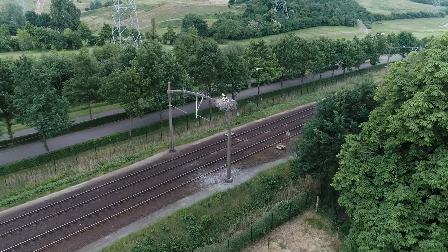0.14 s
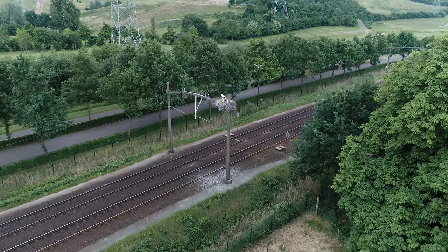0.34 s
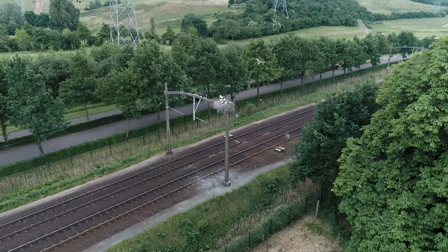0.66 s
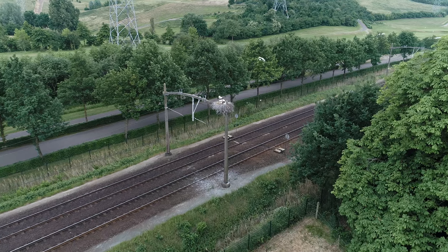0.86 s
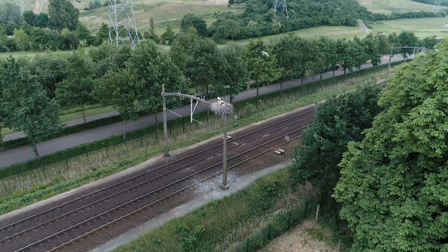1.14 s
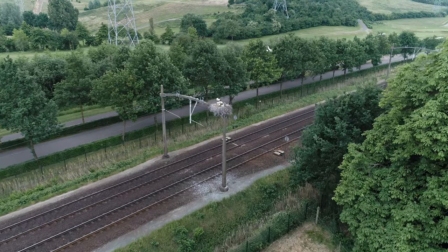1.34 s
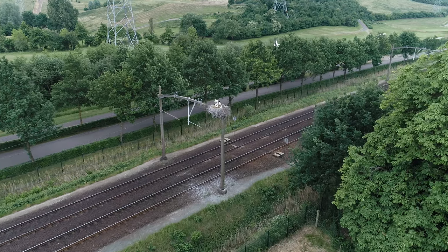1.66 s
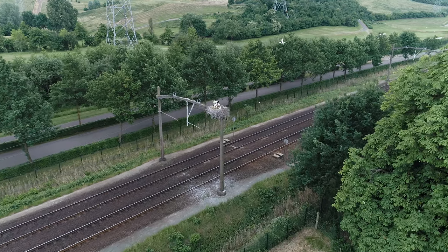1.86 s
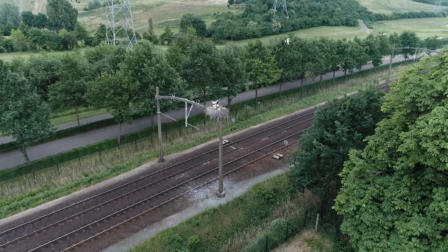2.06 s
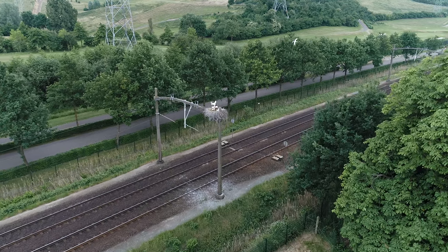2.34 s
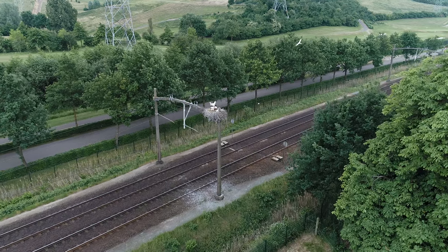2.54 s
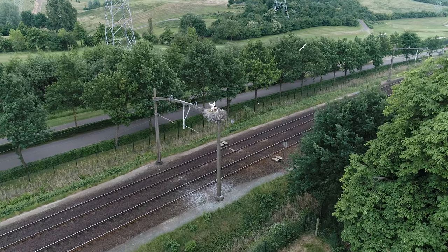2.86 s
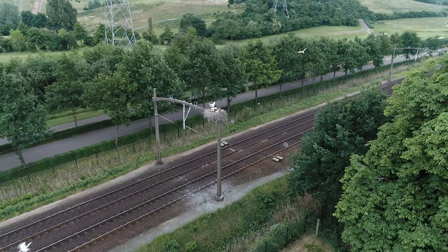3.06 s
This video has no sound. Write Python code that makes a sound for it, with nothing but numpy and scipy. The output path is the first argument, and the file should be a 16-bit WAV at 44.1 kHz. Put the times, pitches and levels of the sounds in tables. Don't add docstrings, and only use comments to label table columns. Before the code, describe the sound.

Distant dry bill-clattering from a stork runs throughout, steady first, slower and softer later, with woody ringing and leafy echoes. Low wind buffets the microphone over faint country noise, slight hiss and high whine.

```python
import sys
import numpy as np
from scipy import signal
from scipy.fft import rfft, irfft
from scipy.io import wavfile
from scipy.ndimage import uniform_filter1d

SR = 44100
rng = np.random.default_rng(int(sys.argv[2]) if len(sys.argv) > 2 else 0)


def transcribe(signal):
    frames = np.atleast_2d(signal).T
    limited = np.clip(frames, -1, 1)
    pcm = np.round(limited * 32767).astype(np.int16)
    wavfile.write(sys.argv[1], SR, pcm)


def invert_db(x):
    u = np.asarray(x, float) / 20
    return 10 ** u


N = 141120
TIME = np.arange(N) / SR
BIN_HZ = np.arange(N // 2 + 1) * SR / N


def colour(points, hz):
    p = np.array(points, float)
    return invert_db(np.interp(np.log(hz), np.log(p[:, 0]), p[:, 1]))


def band(gain):
    return irfft(rfft(rng.standard_normal(N)) * gain, N)


def walk(rate, length=N):
    hold = int(SR / rate)
    levels = np.repeat(rng.standard_normal(length // hold + 1), hold)
    return 1.08 * uniform_filter1d(uniform_filter1d(levels, hold), hold)[:length]


def air(points, flicker_db, rate, drift_db):
    hz = np.maximum(BIN_HZ, 1)
    shape, out, shared = colour(points, hz), 0, walk(0.94)
    for octave in np.arange(4, 14.5, .5):
        slot = np.cos(np.pi * np.clip(np.log2(hz) - octave, -.5, .5))
        shared = .8 * shared + .6 * walk(3)
        level_db = flicker_db * walk(rate) + drift_db * shared
        out = out + band(shape * slot) * invert_db(level_db)
    return out / np.std(out)


def wind():
    # frequency in Hz, level in dB per Hz.
    rumble_colour = [(12, -25), (20, 2), (50, 2), (90, -1), (165, 1.5), (226, -6), (291, -6.5), (400, -12),
                     (560, -18), (720, -21.5), (910, -45), (1540, -120)]
    # time in seconds, level in dB, extra dB of the upper rumble.
    gusts = [(0.0, -24.5, -2.5), (0.18, -37.5, -5.5), (0.36, -35.5, 1), (0.57, -32.5, 2),
             (0.62, -37.5, 2.5), (0.67, -32, 1.5), (0.95, -35, 1.5), (1.18, -39.5, -1), (1.23, -47, -10),
             (1.271, -34, -2.5), (1.39, -33, -5), (1.62, -36, -1), (1.88, -37.5, 4.5), (1.98, -35.5, 5),
             (2.12, -36.5, 3.5), (2.26, -45, 7.5), (2.31, -36.5, 3), (2.55, -37, 1.5), (2.75, -36, -3.5),
             (2.77, -30.5, -6), (2.88, -40.5, 2.5), (3.01, -36, 1), (3.04, -40, 3), (3.2, -38, 0)]
    gust_s, gust_db, upper_db = np.array(gusts).T
    buffet_db, buffet_hz, buffet_s = -25.5, 72.4, 0.042
    split_hz = 187

    buffet = invert_db(buffet_db) * np.cos(2 * np.pi * buffet_hz * TIME) * np.exp(-TIME / buffet_s)
    rumble = air(rumble_colour, 1.5, 14, 1.49)
    upper = irfft(rfft(rumble) / (1 + (split_hz / (BIN_HZ + 1)) ** 4), N)
    rumble = rumble + upper * (invert_db(np.interp(TIME, gust_s, upper_db)) - 1)
    fade_in = 1 - np.exp(-TIME / 0.0022)
    return rumble * invert_db(np.interp(TIME, gust_s, gust_db)) * fade_in + buffet


def land():
    # frequency in Hz, level in dB per Hz.
    land_colour = [(240, -7), (400, -6.5), (617, -6), (759, -1), (1250, -17), (1720, -15), (2630, -24.5),
                   (3330, -23.5), (3800, -32), (4940, -69), (8360, -120)]
    below = [(150, -46)]
    return air(below + list(land_colour), 0.73, 12, 0.12) * invert_db(-54.5)


def hiss():
    # frequency in Hz, level in dB per Hz.
    hiss_colour = [(2500, -5), (4000, 2), (5200, -0.5), (6200, -3.5), (9300, -4), (10600, -9), (11800, -5),
                   (13000, -13), (14800, -7)]
    return air(hiss_colour, 0.56, 5.1, 0.49) * invert_db(-72)


def whine():
    # frequency in Hz, level in dB, share of the frame lit, centre in seconds.
    tones = [
        (11294, -76, .33, .018),
        (14045, -85, .8, .005),
    ]
    frame_hz, waver_db = 25, 1.5
    out = 0
    for hz, db, share, centre in tones:
        phase = ((TIME - centre) * frame_hz + .5) % 1 - .5
        tone = np.sin(2 * np.pi * hz * phase / frame_hz)
        lit = np.exp(-(2 * phase / share) ** 4)
        out = out + invert_db(db + waver_db * walk(31)) * tone * lit
    return out


def surroundings(leaves, high):
    # delay in ms, level in dB of the low resonances, level in dB of the high ones.
    echoes = [(6.41, -19, -18.5), (9.465, -9, -13.5), (17.54, -18.5, -23), (27.1, -28, -17.5),
              (41.4, -23.5, -42)]
    # level in dB, rise in ms, hold in ms, 60 dB decay time in seconds.
    trees = [
        (-10.5, 2.2, 3.3, 0.18),
        (-4.5, 1.3, 23, 0.23),
    ]
    wash_db, rise_ms, hold_ms, t60 = trees[high]
    t = np.arange(len(leaves)) / SR
    rise = 1 - np.exp(-(t * 1000 / rise_ms) ** 2)
    decay = invert_db(-60 * np.maximum(t - hold_ms / 1000, 0) / t60)
    wash = leaves * rise * decay
    response = wash * invert_db(wash_db) / np.sqrt(np.sum(wash ** 2))
    for ms, *db in echoes:
        response[int(ms * SR / 1000)] += invert_db(db[high])
    return response


def bill():
    # start in seconds, peak in dB, brightness in dB.
    claps = [(0.02, -28.5, -2), (0.114, -28.5, -2), (0.211, -28, -2.5), (0.307, -28.5, -1),
             (0.403, -28, -1), (0.502, -29, 0), (0.6, -28, 0.5), (0.696, -27, -1.5), (0.794, -28.5, 0),
             (0.893, -28, -0.5), (0.992, -27, -1.5), (1.089, -28, -1), (1.192, -28, -1), (1.291, -28.5, -1),
             (1.391, -29.5, 0), (1.495, -28, -1.5), (1.603, -29, -2), (1.714, -29.5, 0), (1.825, -30, 1),
             (1.942, -30.5, 1.5), (2.061, -32, -8), (2.192, -32, 2.5), (2.325, -31, 2),
             (2.459, -33.5, -0.5), (2.596, -32, -4.5), (2.73, -32, -7), (2.865, -33.5, -3.5),
             (3.004, -31.5, -5), (3.144, -32.5, -3.5)]
    # time in seconds, how far the head is lowered (0 to 1).
    head_course = [(0, 0), (.4, .05), (.6, .15), (1.5, .16), (1.6, .24), (1.72, .39), (1.83, .43),
                   (1.95, .73), (2.07, .9), (2.2, 1), (3.2, 1)]
    # Hz head up, Hz head down, dB up, dB down, time to peak in ms up, in ms down,
    # echo in dB up, echo in dB down.
    resonances = [(834, 752, -1, 1, 1.55, 1.95, -1.5, -1), (1625, 2050, -6, -12, 1.22, 1.2, -1.5, -4.5),
                  (1500, 1840, -56, -13, 0.36, 0.83, -7, -4), (2325, 2350, -17.5, -42, 1.3, 1.1, -4, 14),
                  (2640, 2700, -15, -42, 0.8, .6, 1.5, 13), (2380, 2380, -64, -13.5, .9, 0.99, 1, 2.5),
                  (2830, 3070, -10.5, -22.5, 0.94, 0.85, -0.5, 5),
                  (3583, 3510, -22.5, -32, 0.87, 0.89, 4, 12), (5070, 4900, -27.5, -33, 0.81, 0.35, -7, 2),
                  (4330, 4200, -32, -35, 1.2, 0.89, -1, 0), (6900, 5900, -24.5, -42, 0.19, .14, -7, -2),
                  (9130, 7900, -30, -41, 0.55, 0.28, -10, 5), (948, 880, -18, -17.5, 1.24, 1.15, 2, 4),
                  (12000, 12000, -32, -52, .1, .1, -10, -10)]
    polarity = [-1, 1, 1, 1, -1, 1, 1, -1, -1, 1, -1, 1, -1, 1]
    build_ms = [.3, .3, .3, .7, 1, .7, 1.4, 1.4, .1, .1, .05, .05, .3, .05]
    scatter_db, detune = 1.1, 0.008
    trees_split_hz, rustle_share = 2400, 0.52
    ground_ms, ground_db = 1.3, -18

    out, t = np.zeros(N + SR), np.arange(2048) / SR
    chance = rng.standard_normal((len(claps), 2 * len(resonances)))
    still = rng.standard_normal(SR // 3)
    head_s, lowered = np.array(head_course).T
    lag = int(ground_ms * SR / 1000)
    for (start, db, bright_db), luck in zip(claps, chance):
        head = np.interp(start, head_s, lowered)
        at = int((start - .0003) * SR)

        def mix(up, down, bend=2):
            return up + (down - up) * head ** bend

        direct, away = 0, np.zeros((2, len(t)))
        for k, (hz0, hz1, db0, db1, ms0, ms1, far_db0, far_db1) in enumerate(resonances):
            age = np.maximum(t - build_ms[k] / 1000, 0)
            u = age * 1000 / mix(ms0, ms1)
            bend = 1 if k == 1 else 2
            hz = mix(hz0, hz1, bend) * (1 + detune * luck[2 * k])
            ring = polarity[k] * u * np.exp(1 - u) * np.sin(2 * np.pi * hz * age)
            ring = ring * invert_db(db - 4.5 + mix(db0, db1) + scatter_db * luck[2 * k + 1])
            direct = direct + ring * invert_db(bright_db * (k > 0))
            away[int(hz > trees_split_hz)] += ring * invert_db(mix(far_db0, far_db1))
        moved = rng.standard_normal(len(still))
        leaves = np.sqrt(1 - rustle_share) * still + np.sqrt(rustle_share) * moved
        echo = sum(signal.fftconvolve(a, surroundings(leaves, high)) for high, a in enumerate(away))
        out[at:at + len(t)] += direct
        out[at + lag:at + lag + len(t)] += direct * invert_db(ground_db)
        out[at:at + len(echo)] += echo
    return out[:N]


def far_calls():
    # start in seconds, length in seconds, frequency in Hz, width in Hz, level in dB.
    calls = [
        (2.512, .03, 5200, 400, -73),
        (2.5, .5, 1700, 40, -71),
        (2.5, .5, 1530, 50, -73),
    ]
    out = 0
    for start, length, centre, width, db in calls:
        tone = band(np.exp(-((BIN_HZ - centre) / width) ** 2))
        swell = np.sin(np.pi * np.clip((TIME - start) / length, 0, 1))
        out = out + invert_db(db) * tone / np.std(tone) * swell
    return out


def scene():
    return (wind() + land() + hiss() + whine() + bill() + far_calls())[None]


def band_limit(x):
    return signal.sosfilt(signal.butter(12, 15010, fs=SR, output="sos"), x)


def record(dry):
    top_cut = signal.ellip(8, .5, 60, 14910, fs=SR, output="sos")
    mix = signal.sosfilt(top_cut, dry)
    return band_limit(mix)


dry = scene()
out = record(dry)
transcribe(out)
```